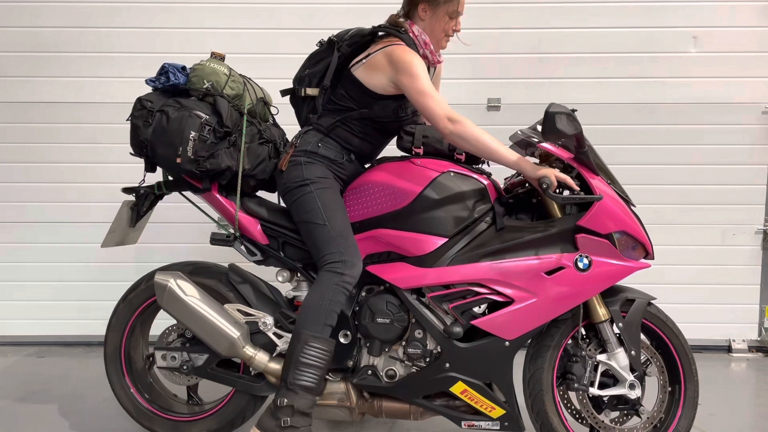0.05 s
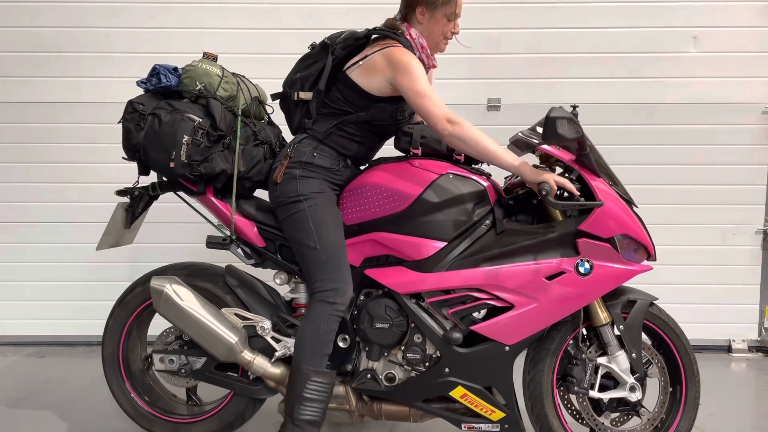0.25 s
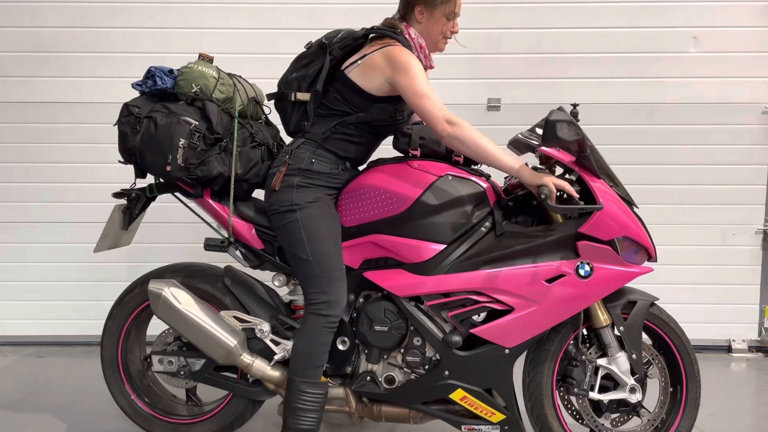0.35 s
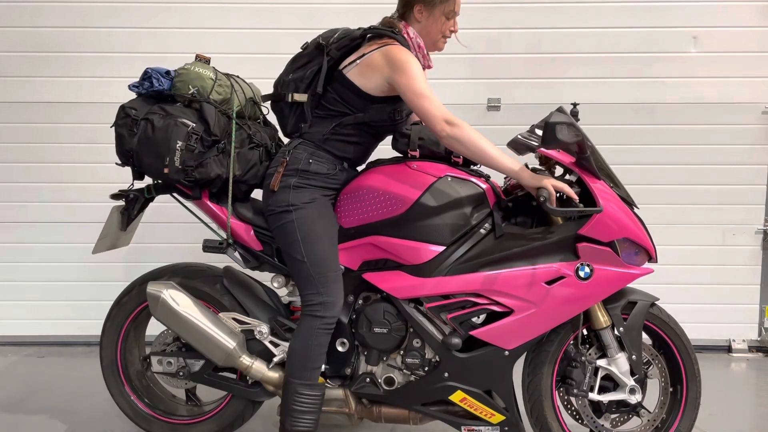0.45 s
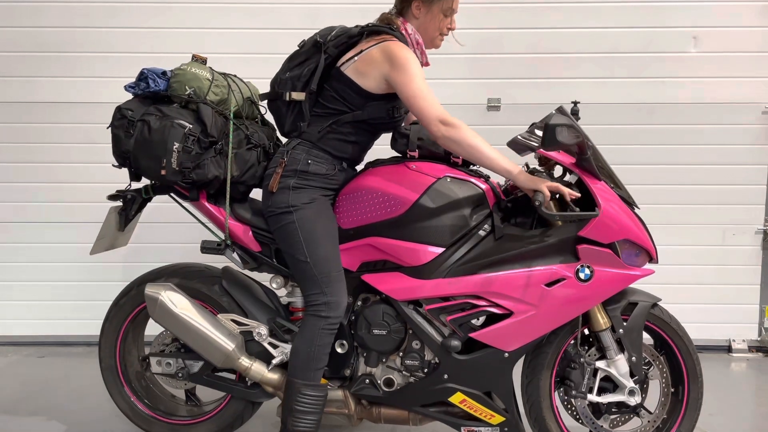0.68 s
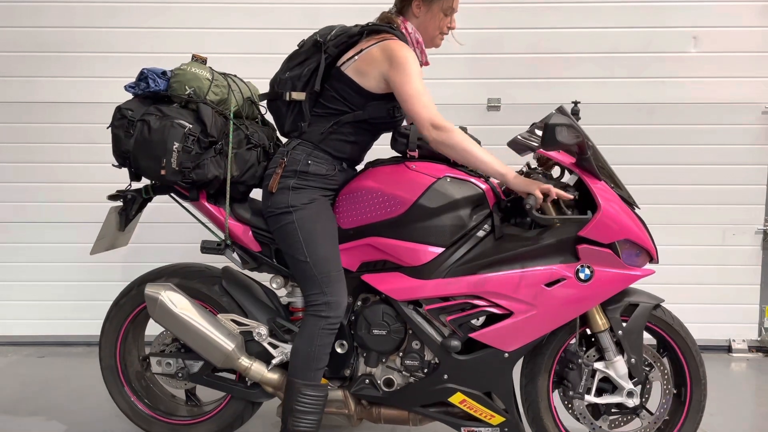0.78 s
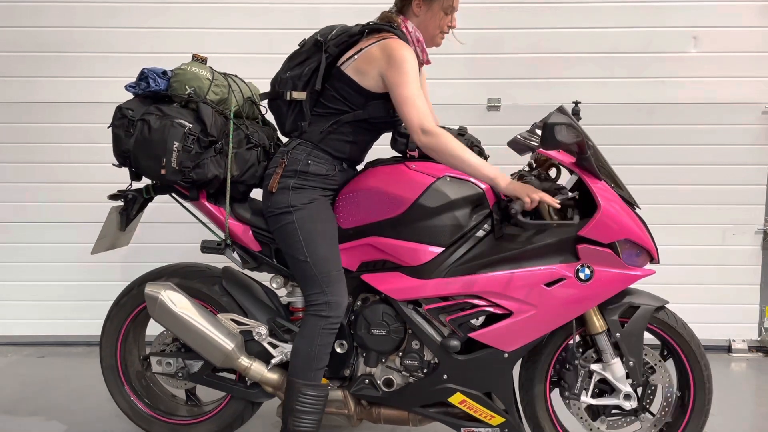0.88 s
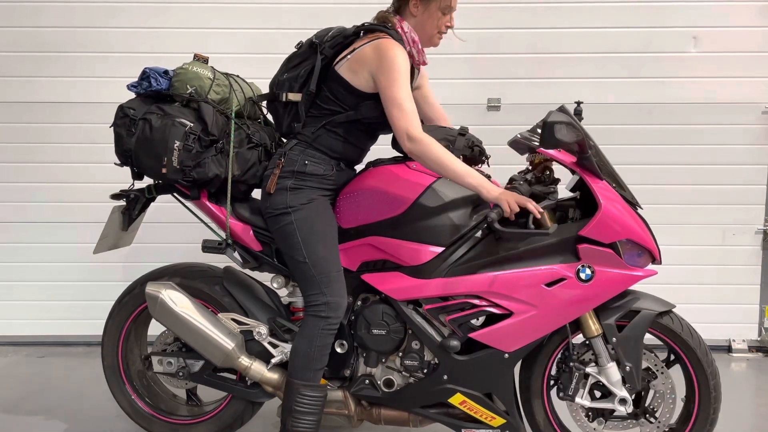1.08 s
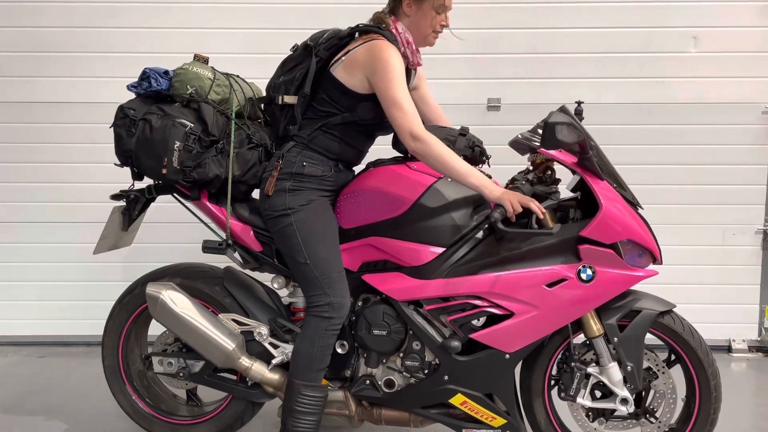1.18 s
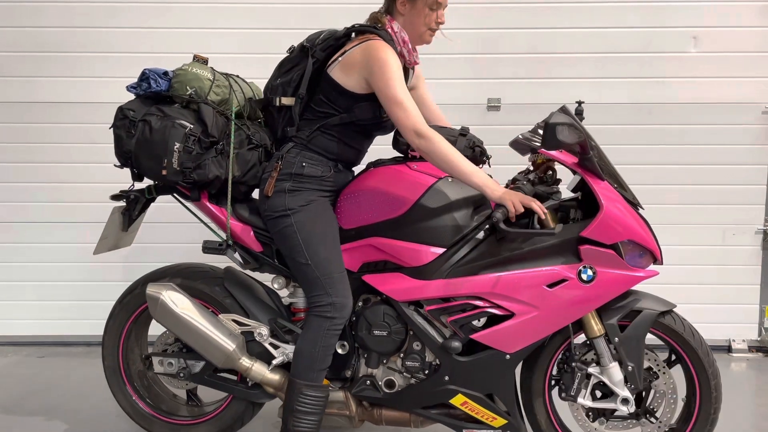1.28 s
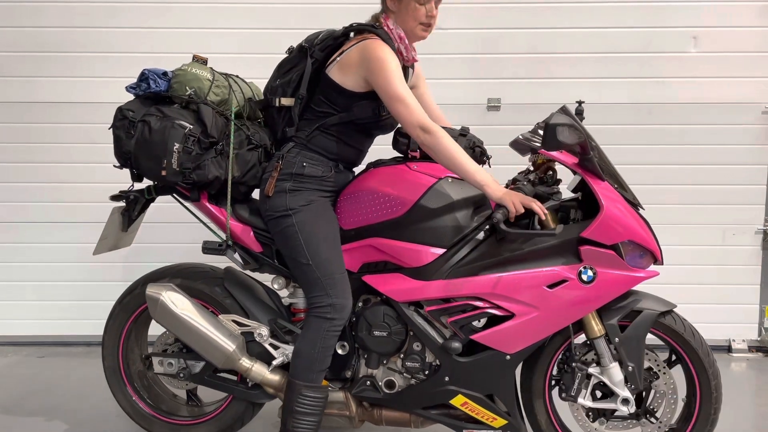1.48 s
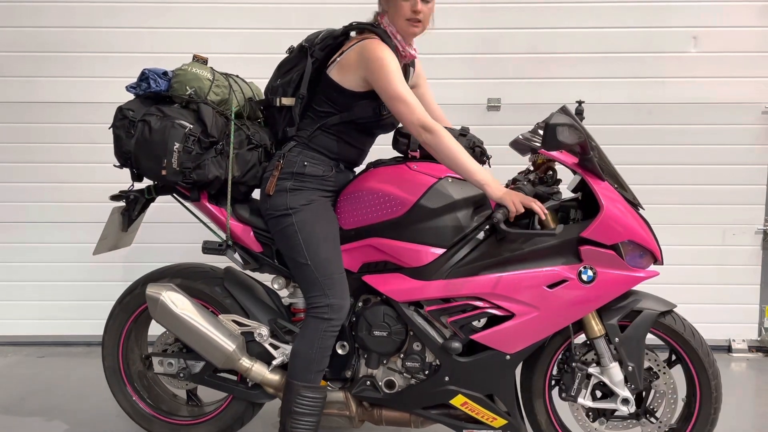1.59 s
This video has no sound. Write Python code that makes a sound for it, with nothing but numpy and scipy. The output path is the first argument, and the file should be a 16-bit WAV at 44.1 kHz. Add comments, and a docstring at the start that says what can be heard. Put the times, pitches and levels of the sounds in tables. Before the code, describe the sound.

A motorcycle side stand snaps up with one sharp metallic clunk that rings briefly through a bare garage. The rider's clothes and luggage then rustle faintly, with small clicks and squeaks over a low rumble.

```python
"""Motorcycle side stand in a bare workshop

The stand snaps up against its stop: a light touch, a hard blow and quick bounces ring the steel
and the bodywork, and the hall answers. The bike settles with a soft thud. The rider's clothes
and luggage shuffle, swish and rub, with small clicks and squeaks, over a low rumble."""
import sys
import numpy as np
from scipy import signal
from scipy.fft import rfft, irfft, next_fast_len
from scipy.io import wavfile
from scipy.ndimage import uniform_filter1d

SR = 44100
rng = np.random.default_rng(int(sys.argv[2]) if len(sys.argv) > 2 else 0)


def store_pcm(level_fs):
    """Save levels as 16-bit WAV."""
    pcm = np.round(np.clip(level_fs, -1, 1) * 32767).astype(np.int16)
    wavfile.write(sys.argv[1], SR, np.atleast_2d(pcm).T)


N = 72765
TIME_S = np.arange(N) / SR


def from_db(db):
    return 10 ** (np.asarray(db) / 20)


def unit_rms(x):
    return x / np.sqrt(np.mean(x ** 2) + 1e-20)


def at_hz(table, hz, column=1):
    """Table column, interpolated over log frequency."""
    table = np.array(table)
    return np.interp(np.log(np.maximum(hz, 1)), np.log(table[:, 0]), table[:, column])


def rise(attack_s, start_s):
    return np.clip((TIME_S - start_s) / attack_s, 0, 1)


def decay(t60_s, start_s=0):
    return (TIME_S >= start_s) * np.exp(-np.log(1000) * np.maximum(TIME_S - start_s, 0) / t60_s)


def resonate(x, hz, width_hz):
    return unit_rms(signal.lfilter(*signal.iirpeak(hz, hz / width_hz, fs=SR), x))


def stereo_noise(spectrum):
    """Diffuse coloured noise at the microphone pair; rms 1."""
    size = next_fast_len(N)
    hz = np.fft.rfftfreq(size, 1 / SR)
    mid, side = rfft(rng.standard_normal((2, size)))
    coherence = np.clip(at_hz(MIC_PAIR, hz), 0, 1)
    pair = np.sqrt(1 + coherence) * mid + np.sqrt(1 - coherence) * side * [[1], [-1]]
    return unit_rms(irfft(pair * from_db(at_hz(spectrum, hz)), size)[:, :N])


# stand on stop: t/s, level/dB, low-pass f/Hz
CONTACTS = [(0.2278, -15, 9000), (0.2296, -6.5, 7000), (0.2335, -5.5, 3000), (0.2352, 0, 7000),
            (0.2376, -2.5, 2200), (0.241, -1.5, 3000)]
# bodywork crack, metal-on-metal snap: f/Hz, level/dB
CRACK_SPECTRUM = [(150, -35), (300, -10.5), (600, -9), (1100, 3.5), (2000, -2), (3600, 0), (5500, -10),
                  (8000, -5.5), (11000, -9), (15000, -24.5)]
SNAP_SPECTRUM = [(600, -24), (2000, 3), (3800, 0.5), (5500, 3.5), (8000, -7.5), (11000, -17), (14500, -17),
                 (16000, -9.5)]
# steel stand and frame: f/Hz, level/dB, t60/s, left minus right/dB
STEEL_MODES = [(259, -36.5, 0.067, 24), (406, -26, 0.098, -2), (897, -22, 0.12, -3), (988, -24.5, .1, 8),
               (1210, -16.5, 0.08, 8), (1571, -31.5, 0.14, -4), (1635, -13, 0.053, -6),
               (1845, -18.5, .1, -6), (2005, -28.5, 0.19, 1.5), (2422, -18, 0.078, -0.5),
               (2711, -18, .05, -0.5), (2970, -20, 0.048, 2), (3606, -14.5, .06, 8.5),
               (3820, -30.5, 0.056, 2), (4395, -31, 0.12, 14), (4806, -28.5, 0.051, 9.5),
               (7120, -25.5, 0.12, -1), (9660, -30, .05, -10.5), (12660, -46, 0.068, 1.5),
               (14300, -35, 0.041, 1)]

def side_stand():
    """Each contact snaps and cracks through the damped bodywork; the hardest rings the steel."""
    crack = from_db(-12) * decay(t60_s=0.014)
    clatter = from_db(-20.5) * decay(t60_s=0.12)
    snap = from_db(-19.5) * decay(t60_s=0.01)
    out = np.zeros((2, N))
    for start_s, db, lowpass_hz in CONTACTS:
        burst = (crack + clatter) * stereo_noise(CRACK_SPECTRUM) + snap * stereo_noise(SNAP_SPECTRUM)
        pole = np.exp(-2 * np.pi * lowpass_hz / SR)
        blow = signal.lfilter([1 - pole], [1, -pole], burst + 1e-18)
        onset = int(start_s * SR)
        out[:, onset:] += from_db(db) * blow[:, :N - onset]
    hardest_s = max(CONTACTS, key=lambda contact: contact[1])[0]
    steel = 0
    for k, (hz, db, t60_s, pan_db) in enumerate(STEEL_MODES):
        gains = from_db(db + pan_db * np.array([[0.5], [-0.5]]))
        mode = decay(t60_s, hardest_s) * np.sin(2 * np.pi * hz * (TIME_S - hardest_s))
        steel += (-1) ** k * gains * mode
    out += from_db(-2) * steel * rise(0.00073, hardest_s)
    radiation = signal.butter(4, 260, "high", fs=SR, output="sos")  # the knocks carry little bass
    return signal.sosfilt(radiation, out + 1e-18)


# bike settling: t/s, level/dB
THUDS = [(0.284, -31)]
# thud: f/Hz, level/dB
THUD_SPECTRUM = [(35, -17.5), (65, 0), (125, 7.5), (180, -5), (250, 0.5), (360, -4), (600, -10.5),
                 (1500, -55)]

def thud():
    """Low, quickly damped thump as the bike settles."""
    envelope = sum(from_db(db) * rise(0.0092, start_s) * decay(0.12, start_s) for start_s, db in THUDS)
    return stereo_noise(THUD_SPECTRUM) * envelope


# buckle and control ticks, boot and control taps: t/s, level/dB
TICKS = [(0.072, -52.5), (0.739, -50), (1.181, -54.5), (1.57, -51.5)]
TAPS = [(0.779, -50), (0.812, -53.5), (0.836, -49.5)]
# their spectra: f/Hz, level/dB
TICK_SPECTRUM = [(300, -13.5), (1500, 9.5), (4500, 0.5), (6500, -8), (11000, -1), (15000, -20.5)]
TAP_SPECTRUM = [(200, -15), (550, 1), (1000, 7.5), (2000, -5), (3500, -5), (6000, -24), (15000, -30)]

def clicks():
    """Small impacts of buckles, boots and controls: short noise bursts."""
    ticks = sum(from_db(db) * decay(0.069, start_s) for start_s, db in TICKS)
    taps = sum(from_db(db) * decay(0.11, start_s) for start_s, db in TAPS)
    return ticks * stereo_noise(TICK_SPECTRUM) + taps * stereo_noise(TAP_SPECTRUM)


def friction(strokes, texture, grain_db, slips_per_s=76):
    """Strokes swell, hold and fade; tiny slips make them grainy."""
    power = 0
    for start_s, length_s, db, attack_s, release_s in strokes:
        fade = np.exp(-2 * np.maximum(TIME_S - start_s - length_s, 0) / release_s)
        power += (from_db(db) * rise(attack_s, start_s) * fade) ** 2
    slips = np.interp(TIME_S * slips_per_s, np.arange(N), rng.standard_normal(N))
    return texture * np.sqrt(power) * from_db(grain_db * slips)


def ringing_noise(spectrum, resonances):
    """Broad friction noise exciting a few resonances."""
    noise = stereo_noise(spectrum)
    rings = sum(from_db(db) * resonate(noise, hz, width_hz) for hz, width_hz, db in resonances)
    return unit_rms(noise + rings)


# friction strokes: t/s, length/s, level/dB, attack/s, release/s
SHUFFLES = [(-0.03, 0.15, -52.5, .02, 0.028), (0.08, 0.15, -49, 0.076, .05),
            (0.72, 0.32, -64, 0.0274, 0.072), (0.95, 0.085, -66, 0.013, 0.1)]
SCUFFS = [(0.735, 0.13, -58, 0.05, 0.036), (0.95, 0.051, -61.5, 0.012, 0.094),
          (1.05, .10, -55.5, 0.032, 0.022), (1.53, 0.035, -59, 0.024, 0.018)]
SWISHES = [(0.07, 0.25, -59, 0.042, 0.064), (0.37, 0.023, -47.5, 0.012, 0.172),
           (0.47, .16, -70.5, 0.04, 0.15), (0.74, 0.073, -65, 0.011, 0.092),
           (0.86, 0.076, -45.5, 0.068, 0.044), (0.945, 0.032, -50, 0.014, 0.12)]
RUBS = [(1.179, 0.13, -50.5, 0.0036, 0.044), (1.29, .23, -50.5, 0.037, 0.076)]
# their spectra: f/Hz, level/dB
SHUFFLE_SPECTRUM = [(70, -7), (120, -4), (200, 0), (330, -5.5), (500, -5), (800, -12), (1200, -13),
                    (2200, -19), (4000, -27.5), (15000, -37)]
SCUFF_SPECTRUM = [(150, -2.5), (500, -6.5), (1000, -3), (1600, -0.5), (2400, -3), (3000, -13), (6000, -34),
                  (15000, -42)]
SWISH_SPECTRUM = [(200, -18), (1000, 3), (2000, 0), (3300, 2), (4600, 3.5), (6000, -4.5), (8000, -4),
                  (10500, -1.5), (12500, 2.5), (15000, -17)]
RUB_SPECTRUM = [(120, 0.5), (300, -2.5), (700, -5.5), (1200, 0.5), (1600, -4.5), (2100, -5.5), (3300, -6),
                (4600, -6), (6000, -12), (8000, -8), (11500, -6), (15000, -25)]
# their resonances: f/Hz, width/Hz, level/dB
SWISH_RINGS = [(4570, 300, -23), (7340, 1200, -3.5), (10280, 1200, -1.5)]
RUB_RINGS = [(551, 54, -17), (857, 24, -18.5), (1143, 65, -15), (1810, 33, -12.5), (2053, 18, -14.5),
             (2396, 95, -13.5), (4380, 71, -21)]

def rider():
    """Clothes and luggage slide: dull shuffles and scuffs, bright swishes, hollow rubs."""
    shuffles = friction(SHUFFLES, stereo_noise(SHUFFLE_SPECTRUM), grain_db=1.5)
    scuffs = friction(SCUFFS, stereo_noise(SCUFF_SPECTRUM), grain_db=1.3)
    swishes = friction(SWISHES, ringing_noise(SWISH_SPECTRUM, SWISH_RINGS), grain_db=2.0)
    rubs = friction(RUBS, ringing_noise(RUB_SPECTRUM, RUB_RINGS), grain_db=0.3)
    return shuffles + scuffs + swishes + rubs


# low bump, then squeaks: t/s, length/s, level/dB, attack/s, release/s, f/Hz, width/Hz
BUMP_AND_SQUEAKS = [(0.435, .05, -56, .012, .02, 270, 70), (0.897, .048, -54.5, .015, .015, 4680, 330),
                    (0.955, .045, -58, .01, .015, 4720, 300), (0.92, .02, -61, .01, .02, 4100, 250),
                    (1.215, .065, -58, .012, .02, 2060, 150)]

def bump_and_squeaks():
    """Narrow noise bands: a soft low bump and brief stick-slip squeaks."""
    out = 0
    for *stroke, hz, width_hz in BUMP_AND_SQUEAKS:
        band = resonate(stereo_noise(SWISH_SPECTRUM), hz, width_hz)
        tone = resonate(band, hz, width_hz)
        out += friction([stroke], tone, grain_db=2.0)
    return out


# hall decay: f/Hz, t60/s
HALL_T60 = [(120, .5), (400, 0.79), (1000, 0.9444), (2000, 0.85), (4000, 0.8865), (7000, 0.67),
            (13000, 0.64)]

def reverb_tail(spectrum, start_s, build_s=0.0041):
    """Diffuse sound builds quickly; each octave decays at its own rate."""
    noise_bins = rfft(stereo_noise(spectrum))
    hz = np.fft.rfftfreq(N, 1 / SR)
    centres_hz = np.geomspace(125, 16000, 8)
    tail = 0
    for centre_hz, share in zip(centres_hz, np.eye(len(centres_hz))):
        octave_gain = at_hz(np.column_stack([centres_hz, share]), hz)
        tail += irfft(noise_bins * octave_gain, N) * decay(at_hz(HALL_T60, centre_hz), start_s)
    return tail * rise(build_s, start_s)


# wall response, diffuse wash of the stand's knock: f/Hz, level/dB
HALL_SPECTRUM = [(120, 5), (1000, -3), (2000, 3), (3600, 1.5), (6000, 4.5), (10000, -11), (14000, 7)]
WASH_SPECTRUM = [(120, -20.5), (330, -2.5), (550, -0.5), (720, -5), (1000, 0.5), (1280, 2), (1450, -3.5),
                 (1900, 2), (2500, -4), (3650, -7), (4500, -10), (5600, -20), (7500, -13), (11000, -22),
                 (15000, -40.5)]

def hall(knocks, delay_s=0.0038, wash_s=0.24):
    """Walls return the knocks; a separate noise wash is the stand's sound radiated all round."""
    response = unit_rms(reverb_tail(HALL_SPECTRUM, delay_s)) / np.sqrt(N)
    reflections = signal.fftconvolve(knocks, response, axes=-1)[:, :N]
    wash = reverb_tail(WASH_SPECTRUM, wash_s + delay_s)
    return from_db(-12) * reflections + from_db(-28.5) * wash


# rumble contour: t/s, relative level/dB
RUMBLE_CONTOUR = [(0.0, -61), (0.032, -54), (0.248, -53.5), (0.312, -44), (0.372, -52), (0.522, -47.5),
                  (0.56, -57), (0.614, -48.5), (0.666, -67), (0.716, -49.5), (0.826, -48), (0.876, -58),
                  (1.02, -49), (1.148, -56.5), (1.342, -46), (1.484, -64), (1.548, -47.5), (1.65, -53.5)]
# rumble, hall air: f/Hz, level/dB
RUMBLE_SPECTRUM = [(25, -38), (40, -12.5), (56, 0.5), (68, -7.5), (100, -13.5), (140, -21), (250, -31.5),
                   (1000, -77)]
AIR_SPECTRUM = [(30, -15), (100, -4.5), (200, -5), (500, -6), (1100, -10), (2200, -17), (4000, -21.5),
                (8000, -27), (12000, -28), (16000, -38)]

def background():
    """Low rumble swelling and sinking over the hall's faint, still air."""
    noise = stereo_noise(RUMBLE_SPECTRUM)
    local_power = uniform_filter1d(np.mean(noise ** 2, axis=0), size=3000)
    level_db = np.interp(TIME_S, *np.transpose(RUMBLE_CONTOUR)) - 2.5
    rumble = from_db(level_db) * noise / np.sqrt(local_power + 1e-9)
    return rumble + from_db(-62.5) * stereo_noise(AIR_SPECTRUM)


def scene():
    """Knocks with their reverberation, small dry movements, background."""
    knocks = side_stand() + thud() + clicks()
    return knocks + rider() + bump_and_squeaks() + hall(knocks) + background()


# microphone pair: f/Hz, diffuse coherence, left lead/rad, left minus right/dB
MIC_PAIR = [(60, .98, 0, 1.5), (330, .9, .05, 2), (620, .4, 0, 2.5), (1150, .45, .3, 2), (1800, .6, .3, 1),
            (2900, .55, 1.0, 2), (4000, .55, 1.2, 2.5), (5700, .25, -.8, 1), (7400, .85, -2.6, .5),
            (8600, .99, -3.14, 0), (10000, .75, -3.9, 0), (11500, .75, -5.4, 0), (12700, .99, -6.28, 0)]

def record(dry, stopband_hz=16500):
    """Two microphones differing in phase and level, then a steep low-pass."""
    size = next_fast_len(N + SR // 10)
    hz = np.fft.rfftfreq(size, 1 / SR)
    left, right = rfft(dry, size)
    balance = from_db(at_hz(MIC_PAIR, hz, column=3) / 2)
    lag = np.exp(-1j * at_hz(MIC_PAIR, hz, column=2))
    pair = irfft([left * balance, right / balance * lag], size)[:, :N]
    return signal.sosfilt(signal.cheby2(14, 70, stopband_hz, fs=SR, output="sos"), pair)


dry = scene()
out = record(dry)
store_pcm(out)
```